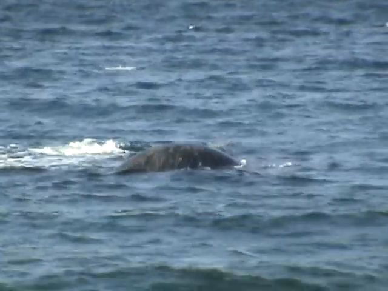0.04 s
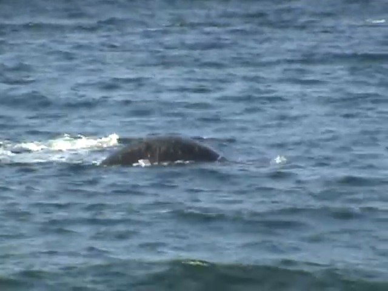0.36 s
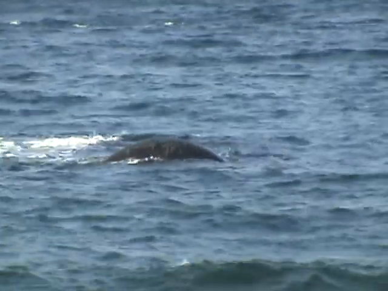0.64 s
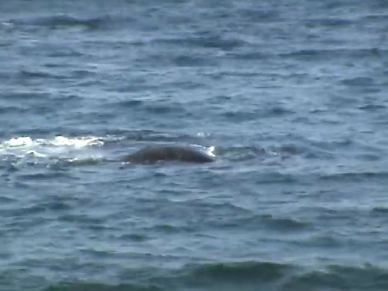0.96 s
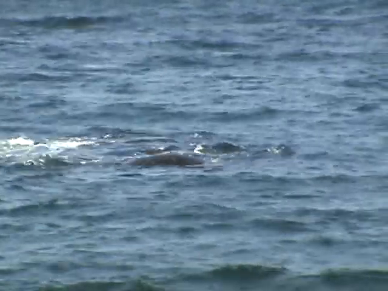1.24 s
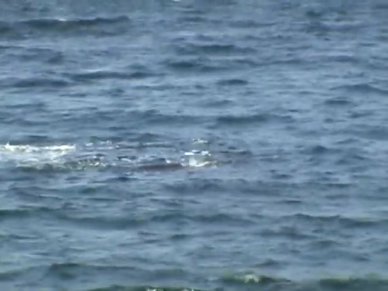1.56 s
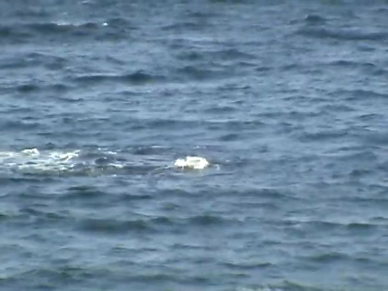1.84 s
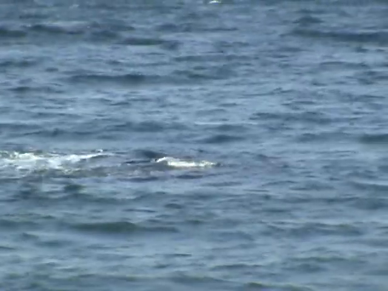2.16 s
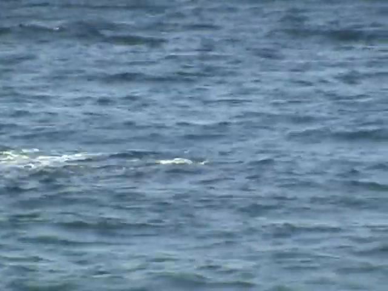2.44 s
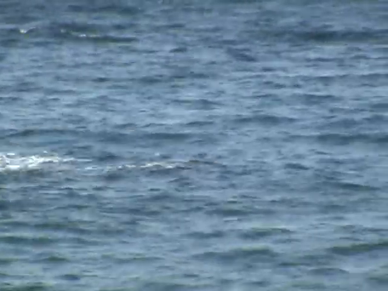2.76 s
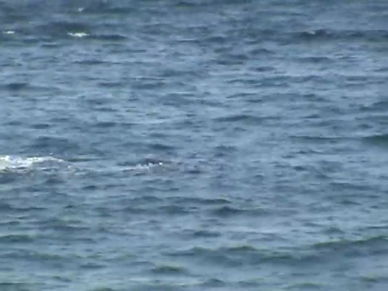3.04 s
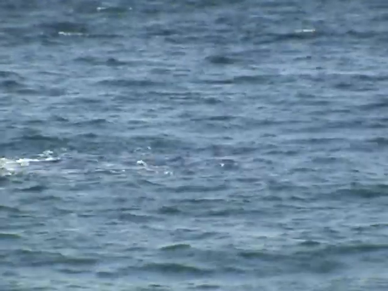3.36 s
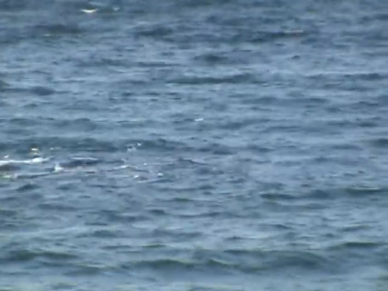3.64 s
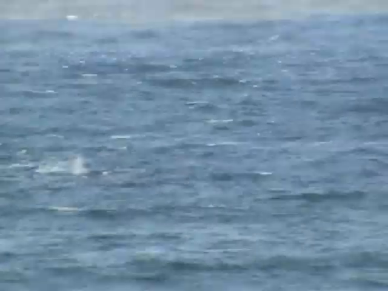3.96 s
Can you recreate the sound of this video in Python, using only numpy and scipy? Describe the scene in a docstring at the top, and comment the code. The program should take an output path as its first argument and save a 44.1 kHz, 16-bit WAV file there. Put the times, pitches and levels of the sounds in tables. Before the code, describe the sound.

Distant sea surf hissing, with gusts of wind thumping and rumbling on the microphone.

```python
"""Surf on an open shore, heard from a distance on a windy day, the microphone facing the sea.
A breaking wave gives a low slap, then hisses and drains away into the steady wash of countless bubbles,
with one soft swell of low roar. Right at the microphone, gusts rumble on its two ports and buffet them
in short bursts; the strongest shed a single eddy that pops."""
import sys
import numpy as np
from scipy import signal
from scipy.io import wavfile
from scipy.ndimage import uniform_filter1d

SR = 44100
rng = np.random.default_rng(int(sys.argv[2]) if len(sys.argv) > 2 else 0)


def unload_audio(sound):
    """Save the sound as a 16-bit wav file, at the path given as the first command line argument."""
    columns = np.transpose(np.atleast_2d(sound))
    # keep every value between -1 and 1, then stretch to whole-number steps
    steps = np.round(np.clip(columns, -1, 1) * 32767)
    wavfile.write(sys.argv[1], SR, steps.astype(np.int16))


N = 176400
TIME = np.arange(N) / SR

# Deep boom, dying after the wave has broken: (time [s], relative level [dB])
BOOM_EBB = [(0.03, -48), (0.28, -47.5), (0.65, -50.5), (1.0, -53), (1.6, -57.5), (2.8, -58), (3.97, -57)]
# Roar of the surf: (time [s], relative level [dB])
ROAR_EBB = [(0.03, -49.5), (0.28, -50), (0.65, -52), (0.93, -54.5), (1.55, -54.5), (1.84, -56.5),
            (2.73, -57.5), (3.97, -56.5)]
# Upper surf, each level relative to its own mean: (time [s], wash [dB], hiss [dB], finest foam [dB])
WASH_EBB = [(0.03, -46.5, -49, -49.5), (0.08, -47.5, -48, -51), (0.19, -46, -47, -50),
            (0.26, -43.5, -50, -50), (0.31, -46, -49.5, -54.5), (0.37, -47.5, -49.5, -53.5),
            (0.45, -49.7, -50, -53), (1.15, -51.5, -56, -55), (1.21, -53, -58, -59.5),
            (1.59, -55.5, -60, -63), (2.66, -58.5, -62, -63), (3.06, -58, -62.5, -64.5),
            (3.3, -56, -63, -64.8), (3.47, -56, -61, -63), (3.71, -57.5, -61.5, -64),
            (3.95, -56, -59, -60.5)]
# Where boom, roar, wash, hiss and foam sit: (centre frequency [Hz])
SURF_RANGES_HZ = [300, 850, 2130, 4700, 8000]
# Colour of the sea from the shore: (frequency [Hz], relative spectral density [dB])
SURF_SPECTRUM = [(40, 4), (120, 6), (200, 5.5), (270, 6.5), (380, 4.5), (520, 1), (700, -1.5), (920, 1.5),
                 (1200, -3), (1700, -1.5), (2100, -4), (2550, -3.5), (3500, -7), (5000, -10), (7600, -11.5),
                 (10000, -22.5), (12500, -30.5), (15500, -48)]
# Stereo width of the sea at the microphone: (frequency [Hz], side against mid [dB])
SURF_SPREAD = [(100, -31), (380, -12.5), (1000, -12.5), (2400, -14), (4400, -13), (8100, -10.5),
               (15000, -16)]
def surf(level_db=-48, flicker_db=0.66, flicker_per_s=14.4, surge_db=0.25, surge_per_s=1.7):
    """Countless far bubbles merge into smooth noise; boom, roar, wash, hiss and foam each ebb apart."""
    swings_db = [db - db.mean() for db in in_time(BOOM_EBB) + in_time(ROAR_EBB) + in_time(WASH_EBB)]
    edges_hz = np.geomspace(40, 16000, 31)
    white = rng.standard_normal((2, 2, N))  # two mid/side pairs, so neighbouring bands are unrelated
    surge = surge_db * drift(surge_per_s)
    out, power = 0, 0
    for k, (low, high) in enumerate(zip(edges_hz, edges_hz[1:])):
        hz = np.sqrt(low * high)
        band = filtered(white[k % 2], [low, high], "band", order=3)
        mid, side = band * from_db(at_hz(SURF_SPECTRUM, hz))
        side *= from_db(at_hz(SURF_SPREAD, hz))
        # each band follows a blend of the nearest ranges
        shares = [np.interp(np.log(hz), np.log(SURF_RANGES_HZ), row) for row in np.eye(len(swings_db))]
        ebb_db = sum(share * swing for share, swing in zip(shares, swings_db))
        gain = from_db(ebb_db - surge + flicker_db * drift(flicker_per_s))
        out += gain * stereo(mid, side, pan_db=0.41)
        power += np.mean(mid ** 2)
    return from_db(level_db) * out / np.sqrt(power)


# Wind strength at the microphone: (time [s], level [dB])
GUSTS = [(0.0, -31.5), (0.03, -53), (0.12, -37.5), (0.15, -56.5), (0.77, -52.5), (0.89, -39), (1.14, -47),
         (1.18, -35), (1.35, -36), (1.39, -47), (1.49, -34), (1.53, -40), (1.66, -32.5), (1.69, -48),
         (1.82, -33.5), (1.89, -48), (1.94, -34), (1.99, -49), (2.2, -46), (2.25, -32.5), (2.42, -49),
         (2.555, -36), (2.62, -46), (2.67, -37.5), (2.71, -40), (2.76, -45.5), (3.29, -54), (3.35, -32),
         (3.42, -44), (3.61, -40), (3.67, -37.5), (3.7, -62), (3.81, -59), (3.86, -46), (4.0, -46)]
def rumble(swirl_hz=(24, 39.4), flutter_hz=(50, 115), mid_db=0.5, side_db=-17):
    """Large swirls press on both ports together; smaller ones flutter between them."""
    wind_db, = in_time(GUSTS)
    mid, side = (evened(low_noise(*swirl_hz)) for _ in range(2))
    flutter = low_noise(*flutter_hz) * from_db(-8.5 - 2 * drift(per_s=12))
    return from_db(wind_db) * stereo(from_db(mid_db) * mid, from_db(side_db) * side + flutter)


# Wind buffets on the ports, plus the low slap of the breaking wave at 0.24-0.28 s
# and a soft, low, centred swell of surf roar at 0.67 s:
# (centre time [s], length [s], level before trim [dB], upper edge [Hz], mid against side [dB])
LOW_BURSTS = [(0.06, 0.013, -34, 328, -1), (0.125, 0.022, -39, 170, -3), (0.24, 0.019, -41.5, 244, 0),
              (.275, 0.0079, -49, 402, 15.5), (0.41, 0.018, -39.5, 300, -6.5),
              (0.67, 0.06, -55.5, 266, 12.5), (0.832, 0.025, -33, 366, -3.5), (0.897, 0.018, -35, 160, 2),
              (0.942, 0.0069, -33.5, 150, -6.5), (1.086, 0.018, -36, 190, -6.5),
              (1.159, 0.0077, -31, 400, -2.5), (1.19, 0.02, -32.5, 412, 2), (1.289, 0.021, -29.5, 193, -7),
              (1.337, 0.041, -37, 160, -10), (1.412, 0.013, -33, 415, -10), (1.463, 0.012, -26, 284, -4.5),
              (1.498, 0.012, -27, 160, -9), (1.609, 0.015, -27, 390, -9), (1.665, 0.024, -37.5, 138, -4),
              (1.766, 0.012, -36, 400, 3.5), (1.937, 0.019, -27, 275, -4.5), (2.02, 0.012, -53.5, 249, 20),
              (2.108, 0.021, -44, 219, 3), (2.226, 0.012, -29, 200, 1.5), (2.25, 0.017, -27.5, 228, -7),
              (2.342, 0.016, -30, 177, -6.5), (2.492, 0.017, -33, 170, -6), (2.534, 0.048, -39, 108, -3),
              (2.694, 0.0057, -36, 110, -11), (2.708, 0.014, -45, 380, 6), (2.738, 0.0089, -53.5, 330, 14),
              (2.895, 0.043, -44.5, 170, -6), (3.356, 0.023, -35, 240, -3.5),
              (3.388, 0.011, -26, 260, -10.5), (3.473, 0.022, -32, 210, -3.5),
              (3.505, 0.015, -28.5, 207, -5.5), (3.651, 0.021, -30.5, 213, -3.5),
              (3.865, 0.017, -44, 200, -7), (3.996, .01, -33.5, 270, -12)]
def buffets_and_wave(trim_db=-3, low_hz=47, mid_band_ratio=0.74):
    """Wind buffets push the ports mostly against each other; the wave's slap and roar are more centred."""
    out = np.zeros((2, N))
    for centre, length, db, edge_hz, shared_db in LOW_BURSTS:
        span = np.flatnonzero(abs(TIME - centre) < 3 * length)
        phase = 2 * (TIME[span] - centre) / length
        swell = np.exp(-phase ** 4 / 2)
        mid = rms_one(swell * low_noise(low_hz * mid_band_ratio, edge_hz * mid_band_ratio)[span])
        side = rms_one(swell * low_noise(low_hz, edge_hz)[span])
        gain = from_db(db + trim_db) * np.sqrt(np.mean(swell ** 2))
        out[:, span] += gain * stereo(from_db(shared_db) * mid, side)
    return out


# Single eddies popping across the ports, levels before trim:
# (time [s], spike level [dB], spike half width [ms], thump level [dB], thump pitch [Hz])
EDDY_POPS = [(0.8944, -28.5, 0.63, -31.5, 50), (1.162, -30, 0.61, -50, 200), (1.178, -28, 0.8, -32.5, 86),
             (1.1982, -30, 0.78, -32, 150), (1.46, -33, 0.67, -29, 124), (1.473, -25.5, 0.57, -26.5, 42.2),
             (1.601, -27, 0.38, -29, 130), (1.764, -25, 0.53, -35.5, 220), (1.766, -25, 0.51, -33, 110),
             (1.930, -30, 0.71, -31, 71), (1.952, -19.5, 0.36, -22.5, 127), (2.2245, -27, 0.72, -25.5, 93),
             (2.242, -30, 0.93, -29.5, 50), (2.704, -26.5, 0.78, -26, 61), (3.3687, -28, .65, -26.5, 42.5),
             (3.395, -32, 0.94, -47, 60), (3.648, -30, .7, -45, 150), (3.659, -32, 0.91, -27, 114)]
def eddies(spike_trim_db=9, thump_trim_db=-0.5, build_db=-15, build_s=0.0041, lag_s=5e-5, pan_db=-0.1):
    """Pressure mounts between the ports to a spike and lets go; both are sucked and thump back."""
    spikes, thumps = np.zeros((2, N))
    for pop_time, db, width_ms, thump_db, thump_hz in EDDY_POPS:
        span = np.flatnonzero(abs(TIME - pop_time) < .12)
        t = TIME[span] - pop_time
        phase, cycles = t * 1000 / width_ms, t * thump_hz
        build = from_db(build_db) * np.exp(-abs(t) / build_s) * (1 - np.tanh(phase)) / 2
        peak = 1 / (1 + phase ** 2 / 2) ** 2
        spikes[span] += rng.choice([-1, 1]) * from_db(db + spike_trim_db) * (build + peak)
        swell = np.exp(-abs(cycles) / np.where(t < 0, 0.28, 1))  # rise and decay, in cycles
        thumps[span] += from_db(thump_db + thump_trim_db) * swell * np.sin(2 * np.pi * cycles)
    spikes = filtered(spikes, 25, "high", order=1)
    opposite = -np.interp(TIME - lag_s, TIME, spikes)  # the right port: inverted and just later
    return thumps + np.array([from_db(pan_db) * spikes, from_db(-pan_db) * opposite])


def air(level_db=-77.5, low_hz=9000):
    """A faint, steady top hiss lies behind everything."""
    return from_db(level_db) * rms_one(filtered(rng.standard_normal(N), low_hz, "high"))


def low_noise(low_hz, high_hz):
    """Lumpy pressure noise that falls away above its upper edge."""
    white = rng.standard_normal(N + SR)
    return rms_one(filtered(filtered(white, low_hz, "high"), high_hz, "low", order=3)[SR:])


def drift(per_s):
    """Slow random wander with a spread of 1."""
    step, settle = 40, 2000
    pole = np.exp(-2 * np.pi * per_s * step / SR)
    white = rng.standard_normal(N // step + settle + 2)
    slow = signal.lfilter([1], [1, -2 * pole, pole * pole], white)[settle:]
    return np.interp(np.arange(N) / step, np.arange(len(slow)), rms_one(slow))


def stereo(mid, side, pan_db=0):
    """Left and right from what the ports share and what pushes them apart."""
    return np.array([(mid + side) * from_db(pan_db), (mid - side) * from_db(-pan_db)])


def from_db(db):
    """Decibels to gain."""
    return 10 ** (np.asarray(db) / 20)


def rms_one(x):
    """Scale to unit rms."""
    return x / np.sqrt(np.mean(x ** 2) + 1e-20)


def evened(x, size=4410):
    """Hold the short-term level of a noise at 1."""
    return x / np.sqrt(uniform_filter1d(x ** 2, size) + 1e-9)


def in_time(rows):
    """Each column of a curve at every sample."""
    times, *columns = np.transpose(rows)
    return [np.interp(TIME, times, column) for column in columns]


def at_hz(points, hz):
    """Read a spectrum on a log-frequency axis."""
    frequencies, levels = np.transpose(points)
    return np.interp(np.log(hz), np.log(frequencies), levels)


def filtered(x, hz, kind, order=2):
    """Butterworth filter."""
    return signal.sosfilt(signal.butter(order, hz, kind, fs=SR, output="sos"), x)


def scene():
    """The sea ahead in the distance, the wind right on the microphone."""
    return air() + surf() + rumble() + buffets_and_wave() + eddies()


def record(dry):
    """The top is cut steeply."""
    cutoff_hz = 15700
    return signal.sosfilt(signal.ellip(10, .1, 80, cutoff_hz, fs=SR, output="sos"), dry)


dry = scene()
out = record(dry)
unload_audio(out)
```